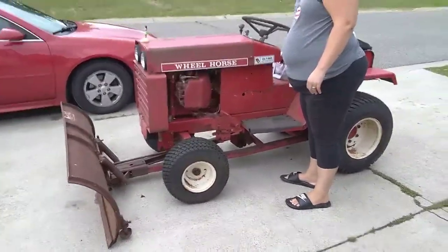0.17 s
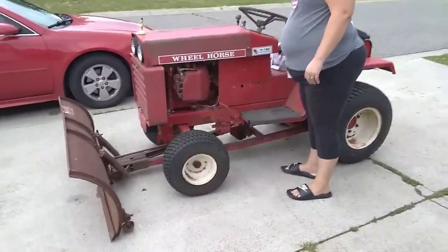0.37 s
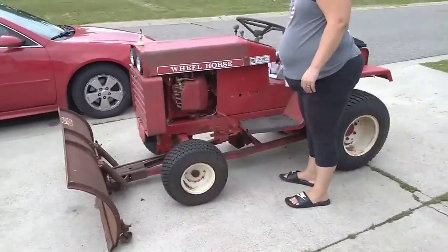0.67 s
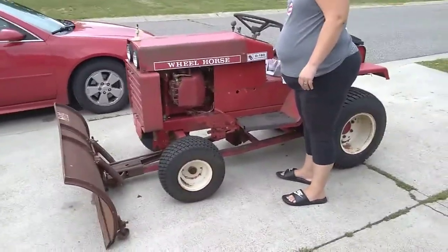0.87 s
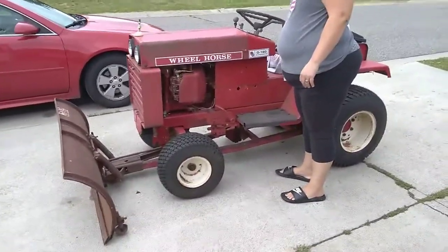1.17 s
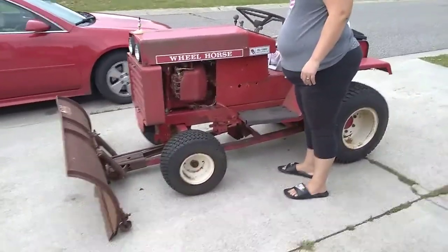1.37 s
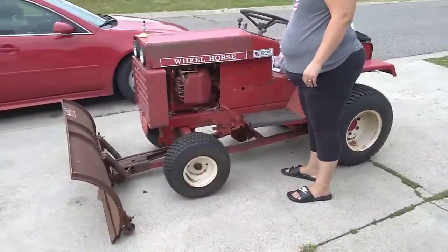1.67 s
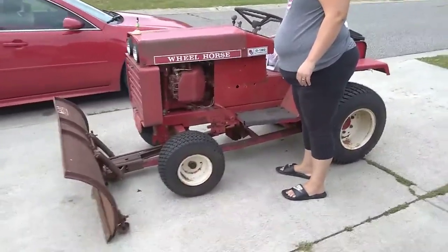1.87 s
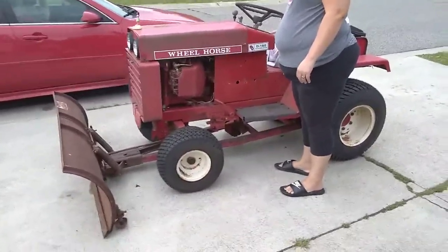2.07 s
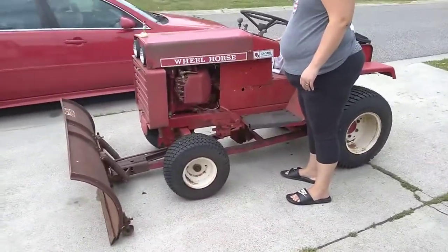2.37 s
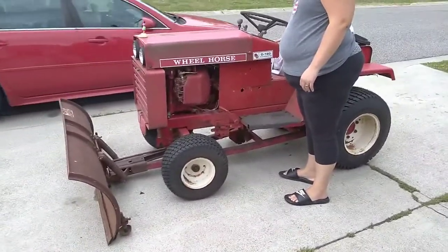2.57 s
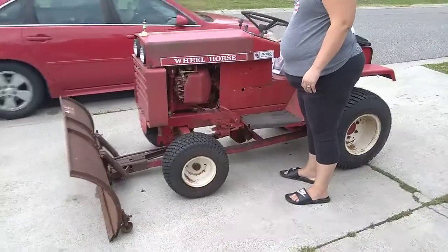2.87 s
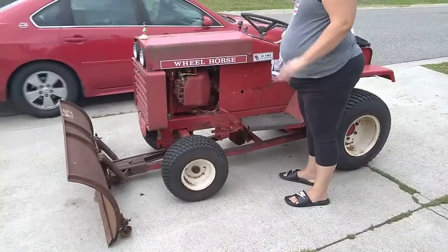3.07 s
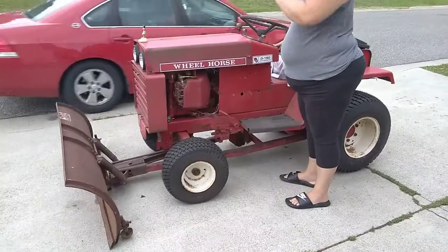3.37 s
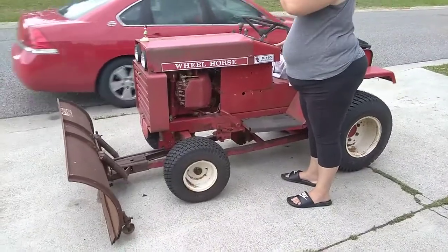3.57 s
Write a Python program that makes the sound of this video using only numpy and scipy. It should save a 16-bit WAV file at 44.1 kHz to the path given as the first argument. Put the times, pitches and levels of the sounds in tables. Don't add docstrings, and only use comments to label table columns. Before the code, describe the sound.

Loud, continuous tractor idle outdoors: fast exhaust throb, rough mid roar, ringing sheet metal and bright loose tin ticks. The pitch lifts, steadies, droops near the end and picks up again, captured close on a phone.

```python
import sys
import numpy as np
from scipy import signal
from scipy.fft import rfft, irfft, next_fast_len
from scipy.io import wavfile
from scipy.ndimage import uniform_filter1d, map_coordinates

SR = 44100
rng = np.random.default_rng(int(sys.argv[2]) if len(sys.argv) > 2 else 0)


def master(y):
    cut = np.clip(np.atleast_2d(y).T, -1, 1)
    pcm = np.round(cut * 32767)
    wavfile.write(sys.argv[1], SR, pcm.astype(np.int16))


def to_linear_factor(level_db):
    exponent = np.asarray(level_db, float) / 20
    return 10 ** exponent


N = 164052

# time_s, turns_hz
CRANK_SPEED = [(0.0, 38.98), (0.11, 39.98), (0.19, 40.32), (0.31, 41.49), (0.47, 41.77), (1.0, 41.2),
               (1.35, 41.66), (1.7, 41.82), (2.0, 41.82), (2.31, 41.6), (2.52, 40.34), (2.72, 39.15),
               (2.84, 38.52), (3.05, 37.65), (3.2, 37.15), (3.45, 37.8), (3.72, 39.05)]
# time_s, loudness_db, rattle_db
ENGINE_EFFORT = [(0.04, -26, -14), (0.32, -25.5, -12.5), (0.36, -29, -13), (0.42, -29, -15),
                 (0.52, -28, -9.5), (0.58, -28, -14), (1.3, -24, -16), (1.35, -27.5, -13.5),
                 (1.64, -26, -15.5), (1.73, -27.5, -13), (1.81, -28, -17), (1.95, -26, -13),
                 (2.3, -29.5, -13.5), (2.76, -25.5, -15.5), (2.86, -28.5, -11), (2.99, -28.5, -12),
                 (3.5, -26, -13.5), (3.68, -26, -14.5)]
FREE_HZ, SAG_HZ = 41.6, 4.2
MIDDLE_LOAD = 0.55

EXHAUST_PULSES = [(.009, .54, .64), (.111, .97, 1.06), (.334, .66, .62), (.589, .74, .78), (.806, .64, .78)]
# light_db, middle_db, heavy_db
THROB_LEVELS = [(-37, -35, -32), (-31, -32, -30), (-27, -41, -44), (-5, -4.5, -6.5), (-14, -16.5, -17),
                (-6, -5, 0), (-10.5, -14, -6.5), (0, -3, -5.5), (-7, -5.5, -4.5), (-3, -4.5, 0),
                (-49, -39, -22), (-19.5, -6.5, -12), (-16.5, -40, -17), (-19.5, -23, -8.5),
                (-18, -11.5, -8), (-7, -8, -8.5), (-23, -10, -40), (-54, -24, -7), (-62, -46, -26)]
THROB_DB, THROB_WOBBLE_DB = 2.5, 1.2
COAST_ORDER, COAST_DB = 4, -3.5
GAIN_ORDER, GAIN_DB = 5, -3
FULL_CHANGE_HZ_PER_S = 4

# multiple_of_crank_speed, light_db, middle_db, heavy_db
FAN_TONES = [(18, -15, -22, -16), (19, -32, -21, -15), (36, -15, -12, -24), (54, -25, -27, -30)]
FAN_JITTER_RAD, FAN_WOBBLE_DB = 1.1, 2

# pitch_hz, width_hz, level_db
PANEL_RINGS = [(700, 80, -4.5), (887, 77, -3), (1011, 44, -1.5), (1145, 50, -2.5), (1635, 106, -3),
               (2815, 40, -11.5), (2918, 92, -14)]
PANEL_DB, PANEL_LOAD_DB = -14.5, 5
KNOCK_JITTER_S, KNOCK_SCATTER_DB = 0.0006, 1.5

# pitch_hz, level_db
ROAR_COLOR = [(25, -55), (65, -9.5), (90, -2.5), (330, -6), (420, -4), (1500, -4.5), (2400, -7),
              (5000, -24)]
# time_s, level_db
ROAR_LEVEL = [(0, 0), (.33, 2), (.38, 0), (.6, 1), (.9, -0.5), (1.1, -1.5), (1.5, 0.5), (1.9, 0.5),
              (2.3, 0.5), (2.7, -0.5), (3.1, -1.5), (3.4, 0), (3.72, 1.5)]
ROAR_DB, ROAR_LOAD_DB, ROAR_WOBBLE_DB = -5.5, 3.5, 0.8
ROAR_PULSE_DEPTH = 0.12

# pitch_hz, level_db
HISS_COLOR = [(3000, -8.5), (5000, -5.5), (6500, -4.5), (8500, -2.5), (10500, -4.5), (12300, -9.5),
              (14200, -9.5)]
HISS_DB, HISS_PUFF_DEPTH = 3.5, 0.13
VALVE_SHARE = 0.43
PUFF_SHARPNESS, PUFF_SCATTER_DB = 1.5, 3
SPIT_PER_S, SPIT_DB = 230, -34.5
PATCH_DB = 1.5

# multiple_of_crank_speed, level_db
HOOD_SHAKES = [(21.5, -20), (23, -14), (24, -9.5), (24.5, -46)]
HOOD_HZ, HOOD_WIDTH_HZ, HOOD_DB = 902, 30, -26.5

# pitch_hz, width_hz, gain
TIN_RINGS = [(5770, 50, 1.7), (6880, 160, 1.6), (13350, 240, 2.1)]
# time_s, peak_db
TIN_TICKS = [(0.1446, -29), (0.191, -28), (0.3363, -29), (0.4075, -38), (0.5074, -24.5), (0.6739, -27),
             (0.7487, -31), (0.7966, -27), (0.819, -26), (0.9894, -25.5), (1.0635, -35), (1.1024, -41),
             (1.2297, -25), (1.2775, -26), (1.3488, -29), (1.3743, -25.5), (1.4236, -25), (1.6077, -43),
             (1.6606, -33), (1.6856, -27), (1.734, -25), (1.7754, -42), (1.7978, -36), (1.8472, -36),
             (1.8796, -35), (1.9504, -31), (2.0562, -35), (2.1191, -31), (2.142, -28), (2.164, -29),
             (2.1866, -28), (2.2573, -36), (2.381, -27.5), (2.4314, -28.5), (2.4793, -38), (2.5456, -41),
             (2.601, -42), (2.8594, -42), (2.8943, -30), (3.097, -28), (3.2261, -35), (3.266, -44),
             (3.2974, -38), (3.4416, -27.5), (3.5184, -35)]
TICK_DB, TICK_T60_S, TICK_LOW_HZ = 6, 0.024, 4200
# time_s, peak_db
BRACKET_CHINKS = [(0.1451, -37), (0.191, -31), (0.2264, -34), (0.3371, -35), (0.4075, -42), (0.4539, -38),
                  (0.4763, -37), (0.5072, -37), (0.6419, -39), (0.6684, -35), (0.7477, -41), (0.7961, -35),
                  (0.8375, -42), (0.8804, -41), (0.9906, -30), (1.0635, -36), (1.1024, -38), (1.1298, -37),
                  (1.1483, -37), (1.2306, -34), (1.4132, -40), (1.511, -41), (1.6077, -40), (1.6856, -33),
                  (1.734, -40), (1.7759, -39), (1.7978, -42), (1.8467, -42), (1.941, -40), (2.0547, -38),
                  (2.1879, -31), (2.2568, -39), (2.4174, -40), (2.5456, -36), (2.5716, -42), (2.601, -42),
                  (2.7227, -35), (2.7477, -31), (2.7751, -45), (2.8938, -35), (3.0964, -34), (3.1203, -39),
                  (3.2261, -30), (3.266, -35), (3.2974, -32), (3.3722, -39), (3.5184, -36), (3.5698, -43),
                  (3.5962, -41), (3.6691, -40)]
CHINK_DB, CHINK_T60_S = 3, 0.04
CHINK_HZ, CHINK_WIDTH_HZ = 13350, 300

# pitch_hz, quarter_turns
PORT_COMB = [(1100, 0), (2140, 1), (3150, 2), (4050, 3), (5200, 4), (6300, 5), (14300, 13)]
COMB_DWELL = 0.067
# pitch_hz, level_db
LOW_SIDE_LEVEL = [(30, -5), (80, -2), (160, -9.5), (330, -6), (500, -9.5), (800, -12), (1000, -40.5)]
# pitch_hz, share
COMB_LEAK = [(1100, .003), (2140, .08), (3150, .2), (4050, .01), (5200, .2), (6300, .5), (9000, .8),
             (14000, .75)]
# pitch_hz, likeness
PORT_LIKENESS = [(100, 0.37), (1500, 0.45), (2600, .3), (3600, 0.25), (4600, 0.55), (7000, 0.55),
                 (14000, 0.65)]
# pitch_hz, level_db
LEFT_LEAN = [(80, -5), (300, 6), (700, 3), (1600, 4), (3000, 0), (5000, 0.5), (8000, 1.5), (14000, 3)]
# pitch_hz, level_db
SIDE_LEVEL = [(1000, -1.5), (1500, -5.5), (2600, 1), (3400, 1), (11000, 0.5), (14000, -2)]
TOP_HZ, TOP_SLOPE_DB_PER_KHZ = 14200, 44
WIND_DB, WIND_HZ, WIND_GUST_DB = -41.5, 90, -3
WEAK_DB, FAINT_DB, GATE_WAVER_DB = -14.5, -65.5, 4


def unit(x):
    return x / np.sqrt(np.mean(x ** 2) + 1e-20)


def along(points, hz):
    f, v = np.transpose(points)
    return np.interp(np.log(hz + 1), np.log(f + 1), v)


def curves(rows):
    s, *columns = np.transpose(rows)
    return [np.interp(np.arange(N) / SR, s, column) for column in columns]


def wobble(rate):
    coarse = np.arange(0, N + 64, 64)
    knots = rng.standard_normal(4000)
    return np.interp(np.arange(N), coarse, map_coordinates(knots, [coarse * rate / SR]))


def filtered(x, response):
    m = next_fast_len(N + SR // 2)
    hz = np.fft.rfftfreq(m, 1 / SR)
    return irfft(rfft(x, m) * response(hz), m)[..., :N]


def rings(table, f):
    total = 0
    for k, (center, width, gain) in enumerate(table):
        total = total + (-1) ** k * gain * 1j * f * width / (center * center - f * f + 1j * f * width)
    return total


def rush(color, edge):
    return unit(filtered(rng.standard_normal((2, N)), lambda hz: to_linear_factor(along(color, hz)) * edge(hz)))


def gate(cycle, places, sharp):
    return sum(np.exp(sharp * (np.cos(2 * np.pi * (cycle - p)) - 1)) for p in places)


def by_load(load, levels_db):
    return np.interp(load, [0, MIDDLE_LOAD, 1], levels_db)


def patchy(x, depth_db):
    z = signal.stft(x, nperseg=256)[2]
    field = rng.standard_normal(z.shape[1:])
    field = uniform_filter1d(field, size=10, axis=0)
    field = uniform_filter1d(field, size=5, axis=1)
    z = z * to_linear_factor(depth_db * unit(field))
    return unit(signal.istft(z, nperseg=256)[1][:, :N])


def bursts(events, t60):
    hits = np.zeros(N)
    for s, db in events:
        hits[round(s * SR)] = to_linear_factor(db)
    t = np.arange(SR // 10) / SR
    shape = to_linear_factor(-60 * t / t60) * (1 - np.exp(-t / 0.0025))
    return signal.fftconvolve(hits, shape)[:N]


def throb(cycle, load):
    out = np.zeros((2, N))
    change = uniform_filter1d(np.gradient(curves(CRANK_SPEED)[0]), size=9000) * SR / FULL_CHANGE_HZ_PER_S
    for step, levels_db in enumerate(THROB_LEVELS):
        k = (step + 1) / 2
        light, heavy = sum(-np.array(sizes) * np.exp(-4j * np.pi * k * p) for p, *sizes in EXHAUST_PULSES)
        start = np.angle(light + load * (heavy - light))
        level_db = by_load(load, levels_db)
        if k == COAST_ORDER:
            level_db = level_db + COAST_DB * np.clip(-change, 0, 1)
        if k == GAIN_ORDER:
            level_db = level_db + GAIN_DB * np.clip(change, 0, 1)
        gain = to_linear_factor(level_db + THROB_WOBBLE_DB * np.array([wobble(6.026), wobble(6)]))
        drift = np.array([np.zeros(N), 3.54 * wobble(5.5)])
        out += gain * np.cos(4 * np.pi * k * cycle + start + drift)
    return to_linear_factor(THROB_DB) * out / np.sqrt(2)


def fan(cycle, load):
    out = np.zeros((2, N))
    for k, *levels_db in FAN_TONES:
        gain = to_linear_factor(by_load(load, levels_db) + FAN_WOBBLE_DB * wobble(21.86)) * np.sqrt(2)
        jitter = FAN_JITTER_RAD * np.array([wobble(16), wobble(25)])
        out += gain * np.sin(4 * np.pi * k * cycle + jitter)
    return out


def panels(cycle, load):
    knocks = np.zeros((2, N + SR))
    for p, size, _ in EXHAUST_PULSES:
        at = np.flatnonzero(np.diff(np.floor(cycle - p)))
        luck = rng.standard_normal((len(at), 4))
        for port in range(2):
            late = (KNOCK_JITTER_S * SR * luck[:, port]).astype(int)
            knocks[port, np.abs(at + late)] = size * to_linear_factor(KNOCK_SCATTER_DB * luck[:, 2 + port])
    table = [(c, w, to_linear_factor(db)) for c, w, db in PANEL_RINGS]
    ring = filtered(knocks[:, :N], lambda f: rings(table, f))
    return to_linear_factor(PANEL_DB + PANEL_LOAD_DB * load) * unit(ring)


def roar(cycle, load):
    pulses = gate(cycle, [p for p, *_ in EXHAUST_PULSES], 23)
    swell = 1 - ROAR_PULSE_DEPTH + 2 * ROAR_PULSE_DEPTH * pulses
    level_db = ROAR_DB + ROAR_LOAD_DB * load + curves(ROAR_LEVEL)[0] + ROAR_WOBBLE_DB * wobble(20)
    return to_linear_factor(level_db) * unit(swell * rush(ROAR_COLOR, lambda hz: hz < 6500))


def hiss(cycle):
    puff = gate(2 * cycle, [2 * VALVE_SHARE], PUFF_SHARPNESS) * to_linear_factor(PUFF_SCATTER_DB * wobble(45))
    puff = 1 - HISS_PUFF_DEPTH + 2 * HISS_PUFF_DEPTH * puff
    spits = (rng.random(N) < SPIT_PER_S / SR) * to_linear_factor(SPIT_DB + 6.7 * rng.exponential(size=N))
    spits = signal.lfilter([1], [1, -0.97], spits)
    noise = rush(HISS_COLOR, lambda hz: (hz > 2500) * np.abs(1 + np.abs(rings(TIN_RINGS, hz))))
    return to_linear_factor(HISS_DB + 0.57 * wobble(8.12)) * patchy((puff + spits) * noise, PATCH_DB)


def hood(cycle):
    shake = np.zeros(N)
    for k, db in HOOD_SHAKES:
        gain = to_linear_factor(db + 0.53 * wobble(8.88)) * np.sqrt(2)
        shake += gain * np.sin(4 * np.pi * k * cycle + 0.4 * wobble(5.6))
    return filtered(shake, lambda f: rings([(HOOD_HZ, HOOD_WIDTH_HZ, 1)], f) ** 2)


def ticks():
    tin = rush(HISS_COLOR, lambda hz: (hz > TICK_LOW_HZ) * (1 + np.abs(rings(TIN_RINGS, hz))))
    tin = patchy(tin, 0.5 * PATCH_DB)
    noise = rng.standard_normal((2, N))
    bracket = unit(filtered(noise, lambda f: rings([(CHINK_HZ, CHINK_WIDTH_HZ, 1)], f)))
    slaps = to_linear_factor(TICK_DB) * bursts(TIN_TICKS, TICK_T60_S) * tin
    return slaps + to_linear_factor(CHINK_DB) * bursts(BRACKET_CHINKS, CHINK_T60_S) * bracket


def wind():
    def color(hz):
        return hz / (30 + hz) / (1 + (hz / WIND_HZ) ** 2) / (1 + (hz / 450) ** 6)
    puffs = unit(filtered(rng.standard_normal(N), color))
    return to_linear_factor(WIND_DB + WIND_GUST_DB * wobble(7)) * puffs


def scene():
    speed = curves(CRANK_SPEED)[0]
    cycle = np.cumsum(speed) / SR / 2
    load = np.clip((FREE_HZ - speed) / SAG_HZ, 0, 1)
    loud_db, rattle_db = curves(ENGINE_EFFORT)
    body = throb(cycle, load) + fan(cycle, load) + panels(cycle, load) + roar(cycle, load)
    engine = to_linear_factor(loud_db) * (body + to_linear_factor(rattle_db) * hiss(cycle))
    return engine + to_linear_factor(HOOD_DB) * hood(cycle) + ticks()


def port_matrix(hz):
    turn = np.interp(hz, *np.transpose(PORT_COMB)) * np.pi / 2
    turn = turn - np.clip(COMB_DWELL, 0, 1) * np.sin(4 * turn) / 4
    turn = np.where(hz < PORT_COMB[0][0], -np.arctan(to_linear_factor(along(LOW_SIDE_LEVEL, hz))), turn)
    leak = np.clip(along(COMB_LEAK, hz), 0, 1)
    alike = np.clip(along(PORT_LIKENESS, hz), 0, 1)
    lean = np.clip(along(LEFT_LEAN, hz) / 8, -0.7, 0.7)
    apart = np.sqrt(np.clip(1 - alike ** 2 - lean ** 2, 0, 1))
    keep = to_linear_factor(-TOP_SLOPE_DB_PER_KHZ * np.clip(hz - TOP_HZ, 0, None) / 1000) / np.sqrt(1 + leak ** 2)
    cos, sin = np.cos(turn), np.sin(turn)
    first_side = 1j * alike * sin + lean * np.abs(sin) * np.sign(cos)
    second_side = apart * sin + 1j * leak * cos
    return keep * np.array([cos, first_side, leak * sin, second_side])


def stereo_gate(mid, side):
    z = signal.stft(np.array([mid, side]), nperseg=2048)[2]
    power = (np.abs(z[:, :1024]) ** 2).reshape(2, 128, 8, -1).sum(axis=2)
    waver_db = GATE_WAVER_DB * unit(uniform_filter1d(rng.standard_normal(power.shape), size=3, axis=2))
    strong = power > power[::-1] * to_linear_factor(2 * (WEAK_DB + waver_db))
    audible = power > to_linear_factor(2 * (FAINT_DB + waver_db))
    z[:, :1024] *= np.repeat(strong & audible, repeats=8, axis=1)
    return signal.istft(z, nperseg=2048)[1][:, :N]


def low_pass(x):
    return signal.sosfilt(signal.butter(12, 15150, fs=SR, output="sos"), x)


def record(dry):
    first_mid, first_side, second_mid, second_side = filtered(dry[[0, 0, 1, 1]], port_matrix)
    side = filtered(first_side + second_side, lambda hz: to_linear_factor(along(SIDE_LEVEL, hz)))
    mid, side = stereo_gate(first_mid + second_mid, side + wind())
    return low_pass(np.array([mid + side, mid - side]))


dry = scene()
out = record(dry)
master(out)
```